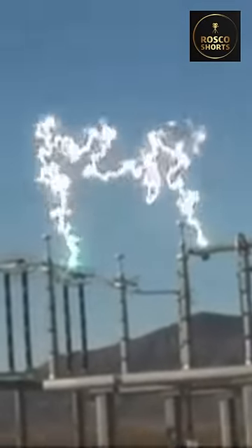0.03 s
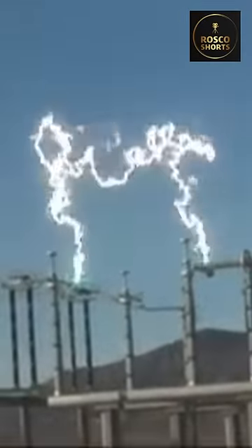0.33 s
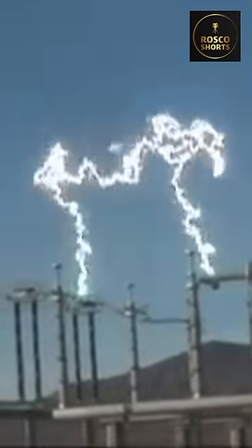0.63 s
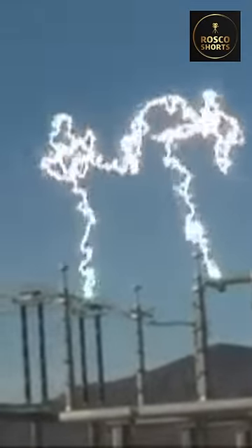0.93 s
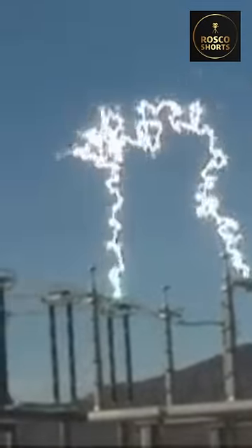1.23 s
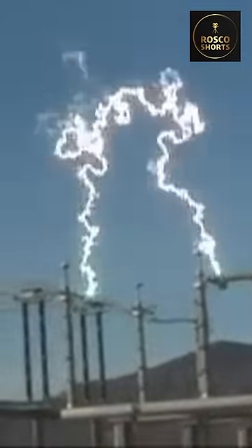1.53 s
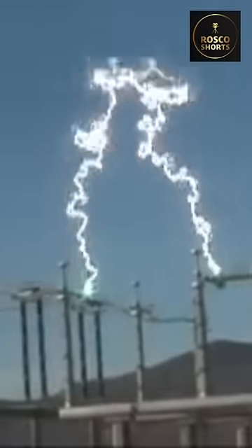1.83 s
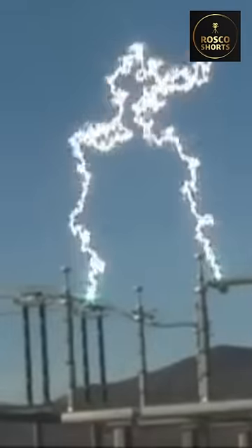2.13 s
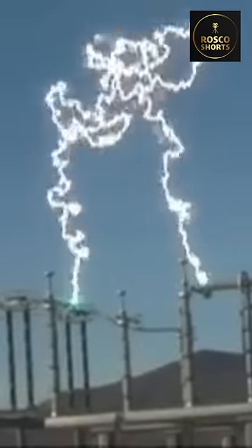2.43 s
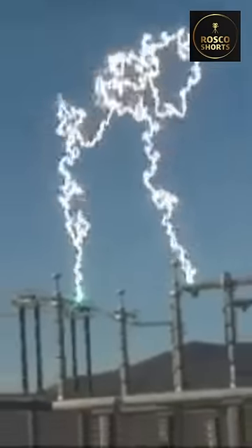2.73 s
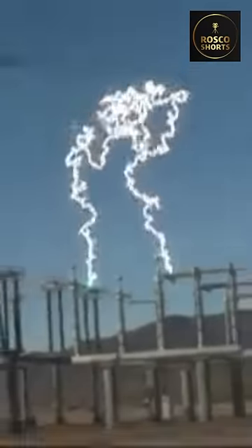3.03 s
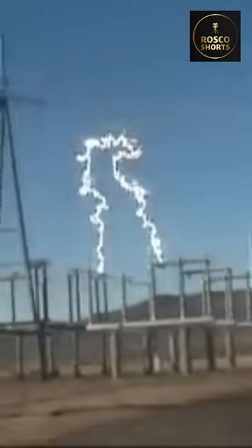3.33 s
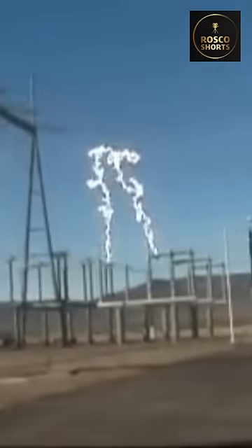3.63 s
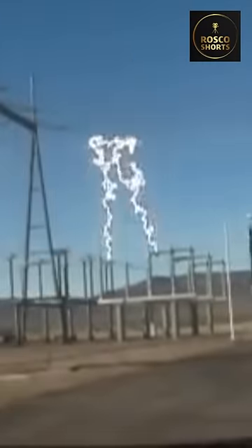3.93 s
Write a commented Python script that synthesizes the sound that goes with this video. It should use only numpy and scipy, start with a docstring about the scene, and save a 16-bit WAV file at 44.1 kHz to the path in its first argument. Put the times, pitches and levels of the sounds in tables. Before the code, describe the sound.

A large electric arc buzzes and crackles throughout the four seconds, straight ahead in the open air. Its deep hum wavers under a dense tearing crackle, with a few thin spark ticks. Sharp snaps come irregularly, strongest around 0.6, 1.3 and 1.4 seconds, thinning after 2.3 seconds. A short low thud lands with a snap at about 3.5 seconds, followed by several smaller snaps as the arc continues.

```python
"""A deep hum and a dense tearing crackle: a long power arc writhes between two poles of a substation.
Outdoors, with the arc straight ahead of a stereo microphone, heard direct and off the ground.
It re-ignites on every half cycle of the mains; the hum's partials swell and fade as the channel bends.
Small sparks tick. Loops of the arc short out with sharp snaps, and a large one collapses with a thud.
Crackle and hum dip briefly after some loud snaps, as their level tables set; peaks are softly rounded."""
import sys
import numpy as np
from scipy import signal
from scipy.fft import rfft, irfft
from scipy.io import wavfile
from scipy.ndimage import uniform_filter1d

SR = 44100
rng = np.random.default_rng(int(sys.argv[2]) if len(sys.argv) > 2 else 0)


def transcribe(u):
    """Save the signal u as a 16-bit wav file named by the first command-line argument.

    u: samples, shape (n,) or (channels, n), limited to [-1, 1]; the rate is SR.
    q: integer samples, one column per channel.
    """
    v = np.clip(np.atleast_2d(u).T, -1, 1)
    q = np.round(v * 32767).astype(np.int16)
    wavfile.write(sys.argv[1], SR, q)


N = 176400
T = np.arange(N) / SR

# the hum's first four partials, before their trims: time_s, level_db
PARTIAL_1 = [(0.0, -15.5), (0.04, -12), (0.15, -13.5), (0.27, -30), (0.29, -20.5), (0.53, -22.5),
             (0.58, -17), (0.6, -22.5), (0.8, -13), (0.87, -18.5), (1.0, -13.5), (1.07, -24), (1.12, -13.5),
             (1.17, -22), (1.2, -19), (1.22, -34), (1.32, -16.5), (1.41, -29), (1.45, -14), (1.5, -23.5),
             (1.55, -37), (1.58, -25), (1.67, -26), (1.74, -19), (1.88, -13), (1.93, -28), (1.95, -44),
             (1.97, -29), (2.06, -14), (2.14, -10.5), (2.16, -18), (2.24, -12), (2.32, -16), (2.54, -16),
             (2.56, -13), (2.8, -11), (2.9, -17), (2.94, -13.5), (3.0, -13.5), (3.53, -12.5), (3.55, -20.5),
             (3.61, -24), (3.68, -18), (3.77, -17), (3.79, -24), (3.84, -19), (3.92, -26), (3.94, -25),
             (4.0, -27)]
PARTIAL_2 = [(0.0, -28.5), (0.09, -17.5), (0.37, -14.5), (0.4, -22), (0.44, -17), (0.5, -20), (0.88, -19),
             (0.92, -28.5), (1.07, -25), (1.19, -17.5), (1.35, -29.5), (1.37, -28), (1.48, -17),
             (1.55, -22.5), (1.58, -33), (1.62, -29), (1.72, -28.5), (1.86, -26), (1.94, -14.5),
             (2.27, -34.5), (2.31, -18.5), (2.33, -18.5), (2.67, -24), (2.72, -28.5), (2.95, -22.5),
             (3.04, -28), (3.22, -22), (3.59, -24.5), (3.63, -40), (3.68, -26), (3.87, -19), (3.97, -20.5),
             (4.0, -36.5)]
PARTIAL_3 = [(0.0, -26), (0.08, -19.5), (0.35, -23), (0.8, -32), (1.02, -26), (1.36, -21), (1.67, -23.5),
             (1.71, -37), (1.83, -24.5), (1.96, -32), (2.21, -16), (2.38, -31), (2.61, -18.5),
             (2.77, -40.5), (2.99, -23), (3.03, -37), (3.14, -17), (3.2, -23.5), (3.41, -25), (3.44, -37),
             (3.49, -21), (3.73, -28.5), (3.77, -18.5), (3.97, -24), (4.0, -35)]
PARTIAL_4 = [(0.0, -35), (0.12, -54), (0.22, -43.5), (0.36, -32), (0.39, -30.5), (1.05, -33), (1.14, -30),
             (1.22, -50), (1.26, -33), (1.6, -25.5), (1.75, -22), (1.79, -34), (2.78, -31), (2.82, -20),
             (3.0, -52), (3.05, -20), (3.19, -42.5), (3.23, -28.5), (3.29, -52), (3.8, -25.5), (4.0, -30)]
# trim of each of those partials: gain_db
PARTIAL_TRIMS = [0.76, 0.11, -0.93, -1.5]
# the weaker partials, from the fifth up: level_db
OVERTONES = [-35.5, -37, -41, -42.5]
# large loops collapsing: start_s, level_db
THUDS = [(1.333, -45), (3.55, -14.5)]
# small sparks, before gain and filtering: start_s, level_db
TICKS = [(1.093, -17), (1.381, -22), (1.414, -8), (1.760, -23), (1.77, -17), (1.851, -25), (3.008, -22),
         (3.383, -21), (3.824, -18)]
# loops shorting out, before SNAP_GAIN_DB: start_s, body_db, pitch_hz, crack_db
SNAPS = [(0.117, -15.5, 1300, -42), (0.1683, -21, 1400, -33), (0.2437, -22, 790, -31),
         (0.3852, -10, 1000, -24), (0.4937, -17, 1900, -24), (0.544, -17, 1390, -38),
         (0.577, -17, 1500, -26), (0.586, -7, 1090, -22), (0.636, -12, 1570, -42), (0.720, -13, 1500, -27),
         (0.884, -12.5, 1490, -28), (1.032, -8, 880, -29), (1.155, -20, 1100, -20), (1.184, -13, 1800, -22),
         (1.333, -8, 840, -17.5), (1.413, -5, 1400, -12.5), (1.6656, -10.5, 1400, -18),
         (1.721, -15, 1800, -31), (1.761, -20, 1900, -22), (1.769, -12, 1410, -27),
         (1.85, -16.5, 1090, -29), (1.910, -13, 1100, -28.5), (2.060, -13, 1100, -30),
         (2.155, -10, 990, -16), (2.259, -10.5, 1200, -34), (2.274, -9.5, 1080, -28),
         (2.505, -16, 2000, -34), (3.008, -13, 1800, -31), (3.186, -16.5, 1300, -35),
         (3.5504, -7.5, 1100, -28), (3.653, -12, 1280, -35), (3.719, -23.5, 2420, -31),
         (3.810, -24, 1500, -27), (3.843, -14, 1500, -20), (3.9207, -18.5, 2350, -24),
         (3.975, -12.5, 1690, -36)]
# spectrum of a snap's crack: frequency_hz, relative_db
CRACK_COLOUR = [(300, -17), (1500, -5), (2800, 3), (5000, -1), (7500, -10.5), (9500, -21), (12000, -18.5),
                (15000, -32)]
# strength of the crackle, before its treble gain: time_s, level_db
CRACKLE_LEVEL = [(0.0, -21.5), (0.135, -22), (0.16, -26), (0.175, -20.5), (0.27, -17.5), (0.3, -20),
                 (0.5, -15.5), (0.53, -20.5), (0.58, -12.5), (0.6, -24), (0.71, -15.5), (0.75, -23.5),
                 (0.88, -17.5), (0.92, -22.5), (0.96, -16), (1.0, -20), (1.03, -20), (1.12, -20),
                 (1.17, -14.5), (1.2, -21), (1.32, -17), (1.36, -21), (1.41, -18.5), (1.5, -20),
                 (1.56, -17.5), (1.62, -16), (1.74, -18.5), (1.76, -14.5), (1.8, -18.5), (1.94, -18),
                 (2.11, -17.5), (2.135, -23), (2.16, -16), (2.24, -19.5), (2.27, -17.5), (2.35, -18),
                 (2.38, -16.5), (2.65, -18.5), (2.75, -18.5), (2.82, -17.5), (2.87, -15.5), (2.96, -17.5),
                 (2.98, -20), (3.06, -18.5), (3.17, -18.5), (3.19, -18), (3.31, -19.5), (3.45, -18.5),
                 (3.48, -18), (3.55, -19), (3.59, -20), (3.65, -18.5), (3.69, -19.5), (3.74, -16),
                 (3.78, -17.5), (3.84, -17), (3.87, -21.5), (3.92, -16.5), (3.94, -22), (3.97, -15.5),
                 (4.0, -17)]
# spectrum of the crackle: frequency_hz, relative_db
CRACKLE_COLOUR = [(25, -16.5), (50, -14.5), (90, -3), (160, 1.5), (300, 2.5), (430, -1), (540, -6),
                  (700, 0.5), (1100, -2), (1380, -7), (1700, -5.5), (2200, -9.5), (2850, -10),
                  (3300, -13.5), (4000, -16.5), (4900, -18.5), (6000, -24.5), (7500, -30.5), (9200, -37.5),
                  (10800, -37.5), (13000, -43.5), (15000, -52)]
# the crackle's treble comes and goes: time_s, gain_db
CRACKLE_TREBLE = [(0, -0.5), (.27, -1), (.34, -1), (1.1, -1.5), (1.47, 0), (1.6, -2), (2.05, -1),
                  (2.3, -1.5), (2.95, -2), (3.1, -2), (3.27, 0), (3.35, -2), (4, -1.5)]
# the ground bounce reaches the microphone later as the arc climbs: time_s, lag_s
GROUND_LAG = [(0, 0.0014), (.3, 0.0015), (.7, .0016), (1.5, 0.0018), (2.0, .0019), (2.5, 0.00191),
              (3.1, 0.002), (4, 0.002)]
# scattered sound that differs between the microphone's two ports: frequency_hz, side_gain_db
STEREO_WIDTH = [(30, -26), (100, -7), (400, -44), (800, -77), (1500, -69), (2400, -30), (3100, -13.5),
                (4000, -7.5), (5200, -6), (6500, -5), (9000, -15), (15000, -26)]

REIGNITION_HZ = 120   # twice the mains frequency
SNAP_GAIN_DB = -3


def from_db(db):
    """Decibels to gain."""
    return 10 ** (np.asarray(db) / 20)


def unit_rms(x):
    """Scale to rms 1."""
    return x / np.sqrt(np.mean(x ** 2) + 1e-20)


def curve(rows):
    """A table of time_s, value, read at every sample."""
    return np.interp(T, *np.transpose(rows))


def drift(rate_hz):
    """Smooth random wander with rms about 1."""
    step, settle = 20, 4000   # computed on every 20th sample, after a run-in
    pole = np.exp(-2 * np.pi * rate_hz * step / SR)
    noise = rng.standard_normal(N // step + settle + 2)
    slow = signal.lfilter([1], [1, -2 * pole, pole * pole], noise)[settle:]
    return np.interp(np.arange(N) / step, np.arange(len(slow)), unit_rms(slow))


def delayed(x, lag_s):
    """Delay by a steady or moving lag."""
    return np.interp(T - lag_s, T, x)


def butter(x, hz, kind, order=2):
    """Butterworth filter."""
    return signal.sosfilt(signal.butter(order, hz, kind, fs=SR, output="sos"), x)


def colour(x, points, keep_power=True, size=4096):
    """Minimum-phase filter that follows a table of frequency_hz, gain_db."""
    hz, db = np.transpose(points)
    bin_hz = np.arange(size // 2 + 1) * SR / size
    gain = from_db(np.interp(np.log(bin_hz + 1), np.log(hz), db))
    cepstrum = irfft(np.log(gain))
    cepstrum[1:size // 2] *= 2
    cepstrum[size // 2 + 1:] = 0
    response = irfft(np.exp(rfft(cepstrum)))
    return signal.fftconvolve(x, response / (np.linalg.norm(response) if keep_power else 1))[:N]


def hum(jitter_s=.00006, wander_hz=0.699, wander_at_db=-22):
    """Partials of the re-ignition rate; the bending channel shifts each one's phase and strength."""
    cycle = 2 * np.pi * REIGNITION_HZ * (T + jitter_s * drift(25))   # re-ignition is slightly unsteady
    out = 0
    for k, (rows, trim_db) in enumerate(zip((PARTIAL_1, PARTIAL_2, PARTIAL_3, PARTIAL_4), PARTIAL_TRIMS), 1):
        level_db = curve(rows)
        waver = from_db(np.minimum(wander_at_db - level_db, 20))   # a partial wavers more as it fades
        detune_hz = wander_hz * drift(2.56) * waver
        phase = 2 * np.pi * np.cumsum(detune_hz) / SR + rng.uniform(0, 2 * np.pi)
        out += np.sqrt(2) * from_db(level_db + trim_db) * np.cos(k * cycle + phase)
    for k, db in enumerate(OVERTONES, 5):
        out += from_db(db) * (drift(6.6) * np.cos(k * cycle) + drift(6.6) * np.sin(k * cycle))
    return out


def thuds(rise_s=0.0092, band_hz=(45.6, 129)):
    """A short low puff of air as a large loop dies."""
    envelope = 0
    for start_s, db in THUDS:
        age = np.maximum(T - start_s, 0) / rise_s
        envelope += from_db(db) * age * np.exp(1 - age)
    return envelope * unit_rms(butter(rng.standard_normal(N), band_hz, "band"))


def ticks(decay_s=0.0011, centre_hz=5500, gain_db=0.5):
    """Small sparks give thin, very short bursts of bright noise."""
    envelope = 0
    for start_s, db in TICKS:
        age = np.clip((T - start_s) / decay_s, 0, 30)
        envelope += from_db(db + gain_db) * (T >= start_s) * np.exp(-age)
    bursts = butter(envelope * rng.standard_normal(N), centre_hz, "high")
    return butter(bursts, centre_hz, "low", order=1)


def snaps(rise_s=.0007, hold_s=.003, decay_s=.0015, band_ratio=1.7):
    """A loop shorts out in a few milliseconds of crowded shocks: a pitched body and a bright crack."""
    out, t = np.zeros(N + SR), T[:SR // 20]
    envelope = np.minimum(t / rise_s, 1) * np.exp(-np.maximum(t - hold_s, 0) / decay_s)
    for start_s, body_db, pitch_hz, crack_db in SNAPS:
        body_shocks, crack_shocks = envelope * rng.standard_normal((2, len(t)))
        body = unit_rms(butter(body_shocks, [pitch_hz / band_ratio, pitch_hz * band_ratio], "band"))
        crack = unit_rms(colour(crack_shocks, CRACK_COLOUR)[:len(t)])
        start = int(start_s * SR)
        out[start:start + len(t)] += from_db(body_db) * body + from_db(crack_db) * crack
    return out[:N] * from_db(SNAP_GAIN_DB) * np.sqrt(np.mean(envelope ** 2))


def spits(decay_s=0.0011, jitter_s=.0013):
    """Envelope of the re-ignitions: each spits with a strength of its own, a little early or late."""
    count = int(N / SR * REIGNITION_HZ)
    start_s = np.arange(count) / REIGNITION_HZ + jitter_s * rng.standard_normal(count)
    starts = np.clip((start_s * SR).astype(int), 0, N - 1)
    kicks = np.zeros(N)
    kicks[starts] = np.minimum(rng.exponential(1, count), 2)
    return signal.lfilter([1], [1, -np.exp(-1 / (decay_s * SR))], kicks + 1e-18)


def crackle(shocks_per_s=5000, spit_gain=0.69, surge_db=1.59, flutter_hz=33.5,
            repeat_gain=0.23, repeat_jitter_s=0.00012, ground_gain=0.29, treble_hz=2360):
    """Tiny shocks from every kink of the channel, in sudden spits: direct and scattered sound."""
    fires = rng.random(N) < shocks_per_s / SR
    strengths = fires * from_db(np.minimum(rng.exponential(1, N), 4))
    surges = (1 + spit_gain * spits()) * from_db(surge_db * drift(flutter_hz))
    # part of the pattern returns in the next half cycle
    repeat_s = 1 / REIGNITION_HZ + repeat_jitter_s * drift(flutter_hz)
    level, treble_gain = from_db(curve(CRACKLE_LEVEL)), from_db(curve(CRACKLE_TREBLE))
    paths = []
    for shocks in strengths * rng.choice([-1, 1], (2, N)):
        at_arc = (shocks + repeat_gain * delayed(shocks, repeat_s)) * surges
        bounce = ground_gain * delayed(at_arc, curve(GROUND_LAG))
        at_mic = unit_rms(colour(at_arc + bounce, CRACKLE_COLOUR))
        low = butter(at_mic, treble_hz, "low", order=3)
        treble = butter(at_mic, treble_hz, "high", order=3)
        paths.append(level * (low + treble_gain * treble))
    return paths


def scene(port_band_hz=(3820, 6240), port_db=-15.5, port_lag_s=0.00016, bass_hz=305, left_bass_db=0.81):
    """The arc is straight ahead; the microphone's ports differ in the treble and slightly in the bass."""
    direct, scattered = crackle()
    mid = hum() + direct + snaps() + ticks() + thuds()
    side = colour(scattered + snaps(), STEREO_WIDTH, keep_power=False)
    side += from_db(port_db) * delayed(butter(mid, port_band_hz, "band"), port_lag_s)
    bass = butter(mid, bass_hz, "low")
    bass = butter(bass[::-1], bass_hz, "low")[::-1]   # the backward pass cancels the phase shift
    side += (from_db(left_bass_db) - 1) * bass
    return np.array([mid + side, mid - side])


def record(dry, limit_db=-5, sense_s=.004, attack_s=.003, release_db_per_s=110,
           ceiling=1.15, cutoff_hz=15300):
    """The recorder rounds peaks softly and cuts the top; its safety limiter is idle below limit_db."""
    power = uniform_filter1d(np.mean(dry ** 2, axis=0), int(sense_s * SR))
    over_db = np.maximum(10 * np.log10(np.abs(power) + 1e-12) - limit_db, 0)
    release_db = release_db_per_s * T
    held_db = np.maximum.accumulate(over_db + release_db) - release_db
    pole = np.exp(-1 / (attack_s * SR))
    reduction_db = signal.lfilter([1 - pole], [1, -pole], held_db)
    rounded = ceiling * np.tanh(dry * from_db(-reduction_db) / ceiling)
    return signal.sosfilt(signal.ellip(10, .1, 80, cutoff_hz, fs=SR, output="sos"), rounded)


dry = scene()
out = record(dry)
transcribe(out)
```